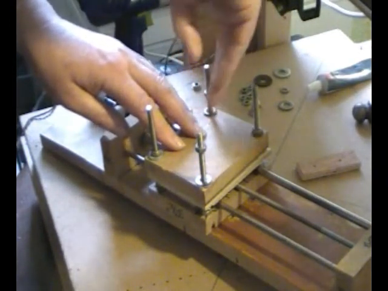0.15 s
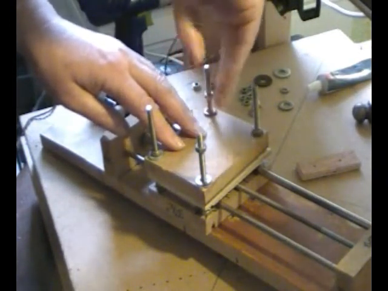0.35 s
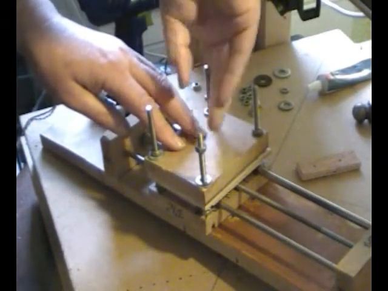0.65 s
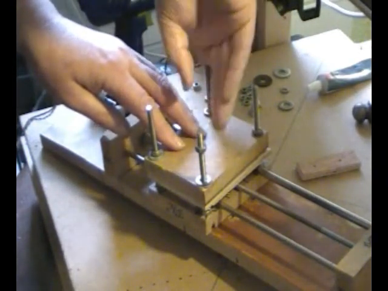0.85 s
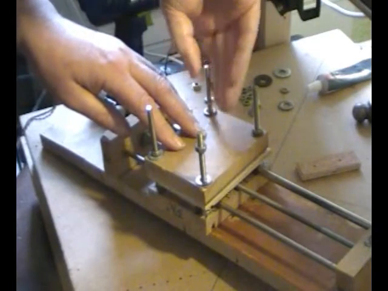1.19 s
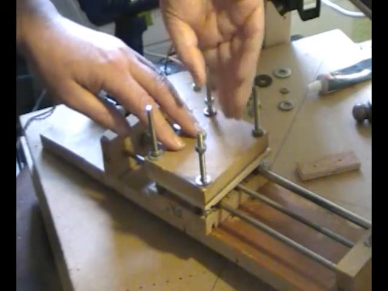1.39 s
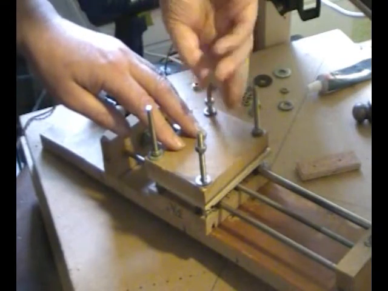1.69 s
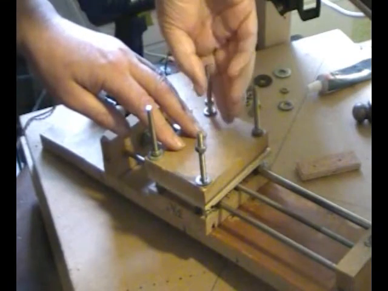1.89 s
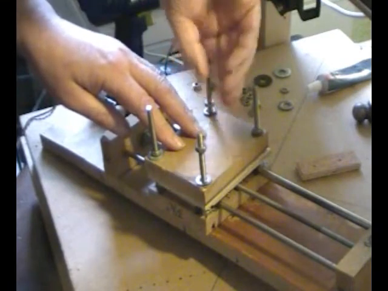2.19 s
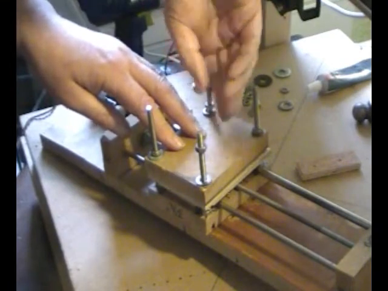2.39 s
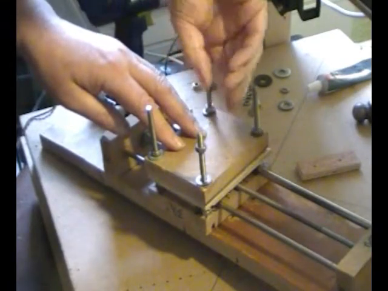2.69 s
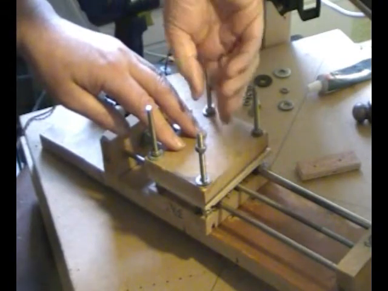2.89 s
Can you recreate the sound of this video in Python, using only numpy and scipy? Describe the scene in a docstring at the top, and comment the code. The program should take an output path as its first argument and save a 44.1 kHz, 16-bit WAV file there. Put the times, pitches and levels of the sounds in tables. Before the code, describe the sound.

A metal nut clicks and rattles as a finger flicks it down a bolt.

```python
"""A finger flicks a steel nut down a long bolt in a wooden jig, about four times a second.
Each flick knocks the nut on the thread; bolt and jig ring briefly, the nut rattles and ticks as it slows.
Near 1 s the hand brushes the jig twice; at 1.3 s the nut coasts with a thin ring.
The flicks resume at 1.5 s, with the hardest knocks at 2.3 s and 3 s.
Throughout: a small workshop with a faint steady hiss."""
import sys
import numpy as np
from scipy import signal
from scipy.fft import next_fast_len
from scipy.io import wavfile

SR = 44100
rng = np.random.default_rng(int(sys.argv[2]) if len(sys.argv) > 2 else 0)


def master(y):
    """Save y as 16-bit WAV."""
    cut = np.clip(np.atleast_2d(y).T, -1, 1)
    pcm = np.round(cut * 32767)  # scale
    wavfile.write(sys.argv[1], SR, pcm.astype(np.int16))


N = 134505

# nut on thread, before offsets: (time [s], level [dB], 2 kHz ring [dB], treble [dB])
KNOCKS = [(0.0034, -13.5, -19, -13.5), (0.0114, -21.5, -12, -10), (0.0679, -28, -20, -8),
          (0.0857, -26.5, -23, -10.5), (0.186, -14, -17, -9), (0.2115, -26, -14, -10),
          (0.2565, -33, -16, -6), (0.2745, -28.5, -16, -8.5), (0.2952, -34, -16, -13),
          (0.3975, -14.5, -15.5, -10), (0.4269, -17.5, -19, -18), (0.4476, -29, -19, -14),
          (0.4586, -30, -12, 3), (0.6, -9.5, -20.5, -7.5), (0.6316, -12.5, -10, -6.5),
          (0.818, -13.5, -16, -12.5), (0.8544, -23, -15, -15.5), (0.8984, -32.5, -18, -15),
          (0.9254, -34.5, -12, -15), (1.0176, -18.5, -10.5, -12), (1.0869, -22, -15, -30),
          (1.0909, -35, -28, -17), (1.1243, -20, -17, -15), (1.1576, -32, -34, -7),
          (1.5324, -20.5, -11, -33), (1.5878, -22.5, -15, -12), (1.6074, -30, -13, -15),
          (1.7698, -17, -8, -7.5), (2.0225, -15, -8, -6.5), (2.0517, -22.5, -8, -9),
          (2.0694, -16, -18, -28), (2.0974, -23.5, -13, -10), (2.1156, -26.5, -14, -18),
          (2.147, -29, -13, -18), (2.2758, -17.5, -8.5, -10), (2.3004, -12.5, -18.5, -16.5),
          (2.3072, -6.5, -2, 6), (2.4422, -35, -10, -20), (2.5026, -46, 18, 7), (2.5342, -15, -7, -5),
          (2.5574, -20.5, 7, -21), (2.5744, -24, -2, -17.5), (2.6339, -30.5, -5, -2),
          (2.6569, -32.5, -13, -19), (2.6669, -34.5, -12, -10), (2.7686, -17, -13.5, -12),
          (2.7884, -18, -2, -7), (2.812, -16, -14, -4), (3.0024, -5, -15.5, -4)]
KNOCK_OFFSET_DB, RING_OFFSET_DB, TREBLE_OFFSET_DB = 9.5, 15, 12
BOUNCE_S, BOUNCE_DB = 0.0028, -9.5


def knocks():
    """The nut strikes the thread and bounces once."""
    out = np.zeros(N)
    for time_s, db, ring_db, treble_db in KNOCKS:
        knock = impact()
        add(knock, BOUNCE_S * rng.uniform(0.7, 1.3), amp(BOUNCE_DB) * impact())
        knock = contact(knock, ring_db + RING_OFFSET_DB, treble_db + TREBLE_OFFSET_DB)
        add(out, time_s, amp(db + KNOCK_OFFSET_DB) * knock / np.linalg.norm(knock))
    return out


# modes of nut, bolt and jig: (frequency [Hz], level [dB], T60 [s])
MODES = [(596.4, -29.5, .13), (1460, -22.5, 0.077), (1784, -16, 0.061), (1953, -10, 0.037),
         (2150.5, -8.5, 0.052), (2343, -15, 0.05), (2837, -12.5, .04), (3095, -12, 0.034),
         (4280, -11.5, 0.031), (5480, -18.5, .04), (7110, -9, 0.036), (8080, -17, 0.019), (8870, -3, 0.018),
         (9210, -10.5, 0.019)]
MODE_SCATTER_DB, MODE_DETUNE = 3, 0.0067
# contact crack: (frequency [Hz], gain [dB])
CRACK_SPECTRUM = [(100, -26.5), (390, -15), (900, -15.5), (1400, -5.5), (2100, 2.5), (2800, 2.5),
                  (3500, -0.5), (4500, 0), (6300, -2), (7300, -1.5), (9100, -1.5), (10000, -9.5),
                  (12500, -11.5)]
CRACK_DB, CRACK_T60_S, CRACK_RISE_S = 5, 0.014, 0.00088


def impact(size=6000):
    """Steel on steel: a noise crack plus decaying modes, unit energy."""
    t = np.arange(size) / SR
    hz, db, t60_s = np.transpose(MODES)[:, :, None]
    detune, scatter, phase = rng.standard_normal((3, len(hz), 1))
    decay = amp(db + MODE_SCATTER_DB * scatter - 60 * t / t60_s)
    ring = decay * np.sin(2 * np.pi * (hz * (1 + MODE_DETUNE * detune) * t + phase))
    crack = noise(CRACK_SPECTRUM, size) * amp(CRACK_DB - 60 * t / CRACK_T60_S)
    knock = (ring.sum(0) + crack) * np.minimum(t / CRACK_RISE_S, 1)
    return knock / np.linalg.norm(knock)


def contact(x, ring_db, treble_db):
    """The contact point favours the 2 kHz ring or the treble."""
    shape = [(900, 0), (1700, ring_db), (2300, ring_db), (3200, 0.012), (5800, 0), (7500, treble_db)]
    return colour(x, shape)


# rattling spins, plus brief fingertip scrapes just before the knocks at 0.18, 0.82 and 1.02 s: (start [s],
# length [s], level [dB], 2 kHz ring [dB], treble [dB])
SPINS = [(0, 0.021, -36, -10, -2), (0.177, 0.0066, -41, -1, -3), (0.203, 0.025, -36, -4, -2.5),
         (.422, 0.044, -38.5, -0.5, 0), (.612, 0.031, -38, -1.5, -7), (0.81, .006, -39.5, -5, -2.5),
         (.832, 0.04, -40.5, 1.5, -4.5), (1.008, 0.0051, -45, -12, 2), (1.075, 0.023, -35, -2, 0.5),
         (1.113, 0.039, -38.5, -1, -4), (1.536, 0.038, -39.5, 0.5, -5), (1.791, .036, -46.5, 0.5, -4),
         (2.052, 0.029, -37, -1.5, 1), (2.317, 0.049, -39.5, 2, -1), (2.54, 0.035, -38, 2.5, -4),
         (2.775, 0.042, -45, 1, 2.5)]
SPIN_RISE_S, SPIN_FALL_S, TAPS_PER_S, TAP_SPREAD_DB = 0.0038, 0.006, 1500, 3.5


def spins(places=4, size=9000):
    """The spinning nut chatters on the thread, and before some flicks the fingertip scrapes it: tiny random
    taps at several places."""
    out, t = np.zeros(N), np.arange(size) / SR
    for start_s, length_s, db, ring_db, treble_db in SPINS:
        drive = np.minimum(t / SPIN_RISE_S, 1) * np.exp(-np.maximum(t - length_s, 0) / SPIN_FALL_S)
        hits = rng.random((places, size)) < TAPS_PER_S / places / SR
        taps = hits * amp(TAP_SPREAD_DB * rng.standard_normal((places, size))) * drive
        rattle = sum(signal.fftconvolve(train, impact()) for train in taps)
        rattle *= np.sqrt(length_s * SR) / (np.linalg.norm(rattle) + 1e-9)
        add(out, start_s, amp(db) * contact(rattle, ring_db, treble_db))
    return out


# coasting nut: (frequency [Hz], gain [dB])
COAST_SPECTRUM = [(300, -22), (6000, -20), (6800, -27), (7130, -1.5), (7600, -18), (8100, -10), (8550, -16),
                  (8900, -10), (9800, -21), (12500, -21.5)]


def coast():
    """The nut runs freely with a thin ring: friction noise peaking near 7 kHz."""
    return slide(start_s=1.268, length_s=0.125, db=-55, spectrum=COAST_SPECTRUM)


# hand on jig: (start [s], length [s], level [dB])
BRUSHES = [(0.987, 0.033, -58), (1.15, .15, -62)]
# hand friction: (frequency [Hz], gain [dB])
BRUSH_SPECTRUM = [(100, -30), (350, -6), (600, -6), (900, 0), (1300, -2), (2000, -13), (6000, -30),
                  (12500, -40)]


def brushes():
    """The hand rubs lightly over the wood."""
    return sum(slide(*row, BRUSH_SPECTRUM) for row in BRUSHES)


def slide(start_s, length_s, db, spectrum):
    """Light sliding contact: a half-sine swell of friction noise."""
    progress = np.clip((np.arange(N) / SR - start_s) / length_s, 0, 1)
    return amp(db) * np.sin(np.pi * progress) * noise(spectrum)


# wall tail decay: (frequency [Hz], T60 [s])
TAIL_T60 = [(300, 1.02), (800, -0.02), (2100, 0.39), (5500, 0.31), (9000, 0.22), (12500, 0.4)]
# wall tail colour: (frequency [Hz], gain [dB])
TAIL_SPECTRUM = [(200, -0.5), (370, 6.5), (480, 1.5), (600, 8), (800, 1), (1200, 8.5), (2200, -1),
                 (5000, 0.5), (9000, -1), (12500, -2)]
TAIL_DB, TAIL_RISE_S, EARLY_DB, EARLY_T60_S = -7, 0.01, -7.5, 0.046


def room(x, size=22050):
    """Early reflections off the bench, a short tail off the walls."""
    t = np.arange(size) / SR
    hz, frame_s, bands = signal.stft(rng.standard_normal(size), SR, nperseg=256)
    bands *= amp(-60 * frame_s / read(TAIL_T60, hz)[:, None])
    tail = signal.istft(bands, SR, nperseg=256)[1][:size] * np.minimum(t / TAIL_RISE_S, 1) ** 2
    tail = colour(tail / np.linalg.norm(tail), TAIL_SPECTRUM)
    early = rng.standard_normal(size) * (rng.random(size) < 0.04)
    early *= (t > 0.002) * amp(-60 * t / EARLY_T60_S)
    response = amp(TAIL_DB) * tail + amp(EARLY_DB) * early / np.linalg.norm(early)
    return signal.fftconvolve(x, response)[:N]


# workshop hiss: (frequency [Hz], gain [dB])
HISS_SPECTRUM = [(18, -60), (30, -17), (76, -21), (402, -5), (650, -4.5), (815, -1), (1250, -3), (1420, -6),
                 (3610, -9.5), (3890, -12), (8940, -13), (10900, -16), (12400, -14.5), (16100, -45),
                 (22000, -120)]


def hiss(rms_db=-61):
    """Steady workshop background."""
    return amp(rms_db) * noise(HISS_SPECTRUM)


def amp(db):
    """Decibels to gain."""
    return 10 ** (np.asarray(db) / 20)


def noise(spectrum, size=N):
    """Coloured noise, unit rms."""
    x = colour(rng.standard_normal(size), spectrum)
    return x / np.sqrt(np.mean(x ** 2) + 1e-20)


def read(points, hz):
    """Table lookup on a log-frequency axis."""
    point_hz, value = np.transpose(points)
    return np.interp(np.log(hz + 1), np.log(point_hz + 1), value)


def add(mix, time_s, sound):
    """Mixes a sound in at its time."""
    part = mix[max(round(time_s * SR), 0):][:len(sound)]
    part += sound[:len(part)]


def colour(x, spectrum, pad=1024):
    """Minimum-phase filter from (frequency [Hz], gain [dB]) points."""
    n = next_fast_len(len(x) + pad)
    log_gain = np.log(amp(read(spectrum, abs(np.fft.fftfreq(n, 1 / SR)))))
    response = np.exp(np.conj(signal.hilbert(log_gain)))
    return np.fft.ifft(np.fft.fft(x, n) * response).real[:len(x)]


def scene(jig_cutoff_hz=195):
    """Nut on a small jig that radiates no bass; hand, room and hiss. Mono."""
    highpass = signal.butter(3, jig_cutoff_hz, "high", fs=SR, output="sos")
    nut = signal.sosfilt(highpass, knocks() + spins() + coast())
    direct = nut + brushes()
    return (direct + room(direct) + hiss())[None]


SHELF_HZ, TOP_HZ, SHELF_DB = 12600, 16000, -26


def record(dry):
    """The treble drops to a faint shelf, then ends."""
    lowpasses = (signal.firwin(301, hz, window=("kaiser", 8), fs=SR) for hz in (SHELF_HZ, TOP_HZ))
    body, wide = (signal.oaconvolve(dry, fir[None], "same") for fir in lowpasses)
    return body + amp(SHELF_DB) * (wide - body)


dry = scene()
out = record(dry)
master(out)
```